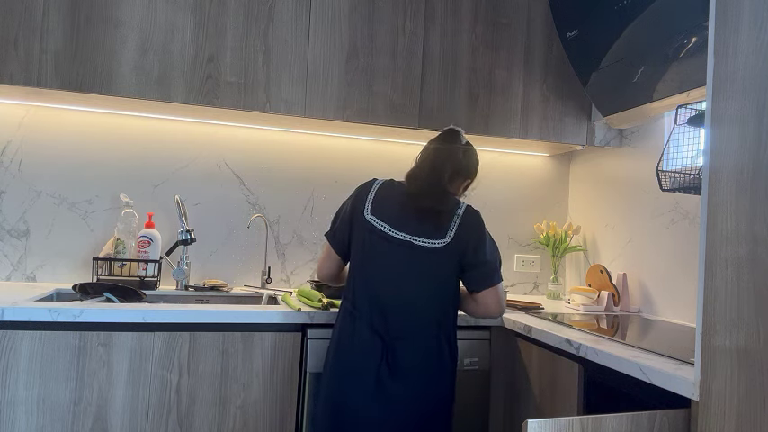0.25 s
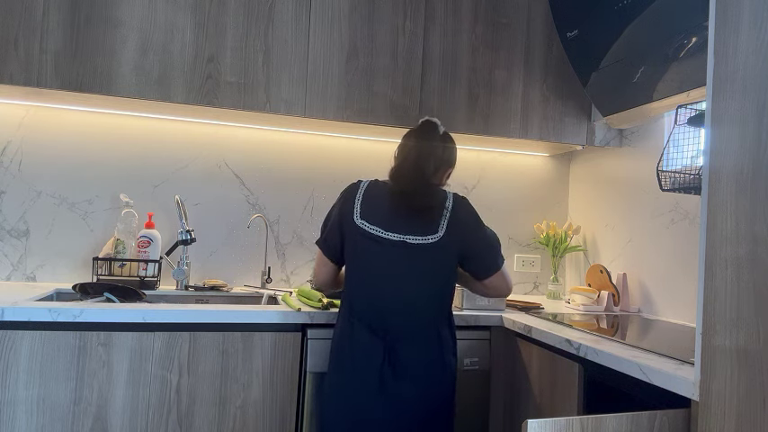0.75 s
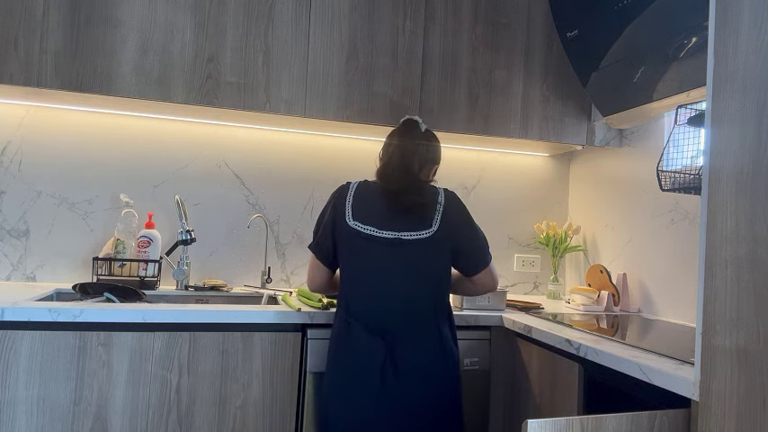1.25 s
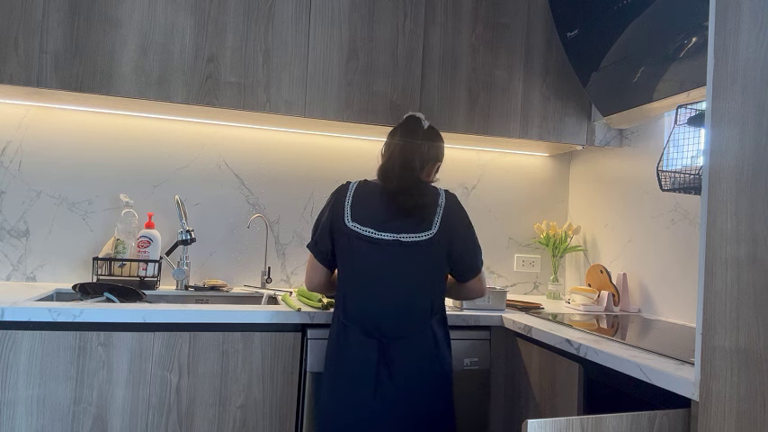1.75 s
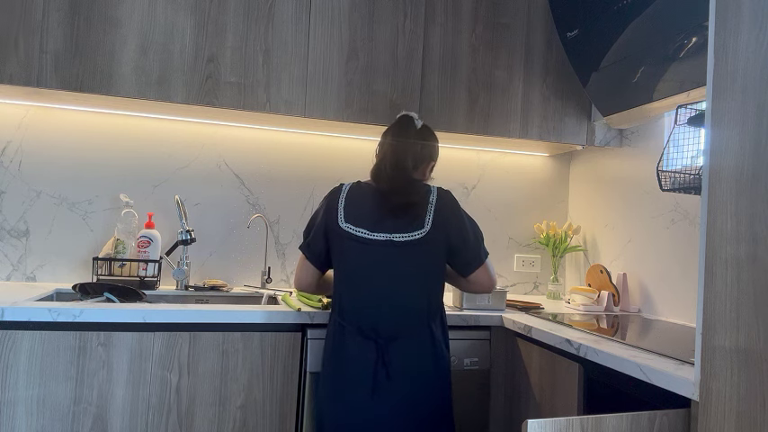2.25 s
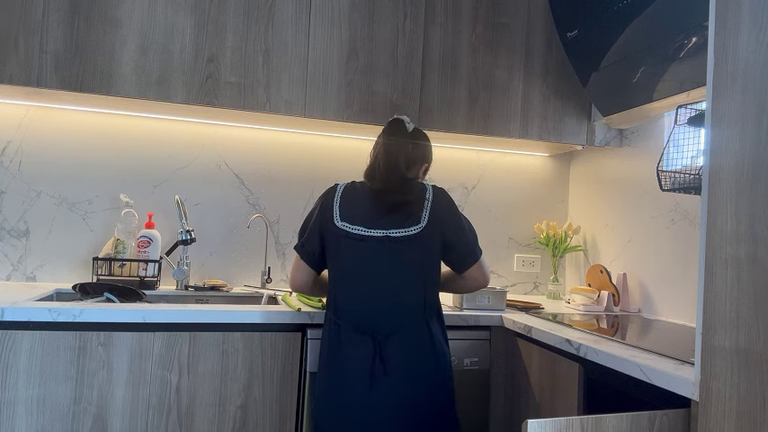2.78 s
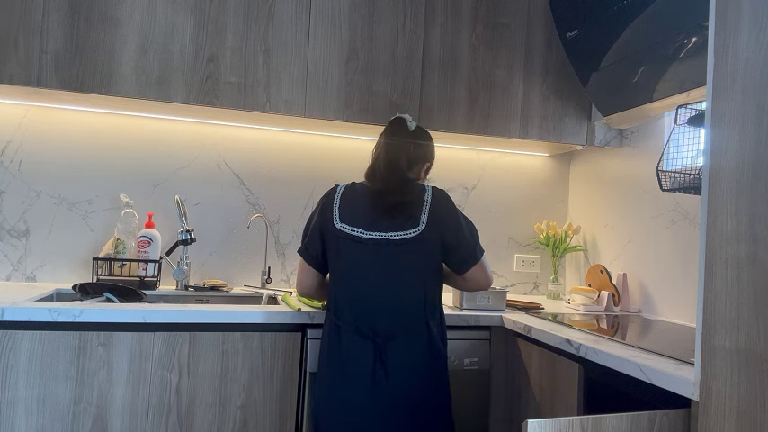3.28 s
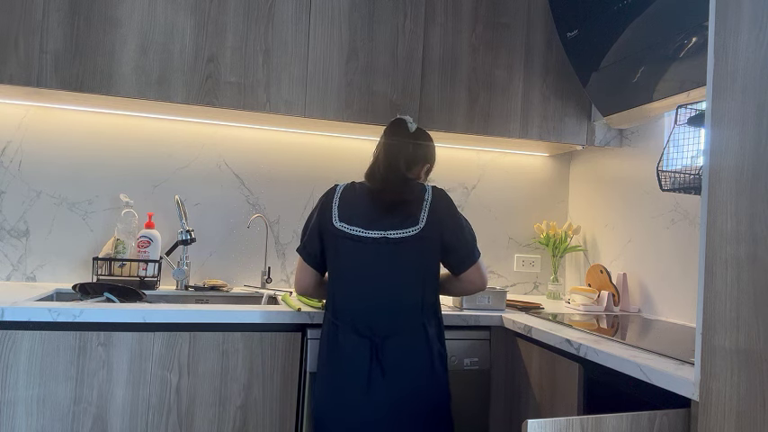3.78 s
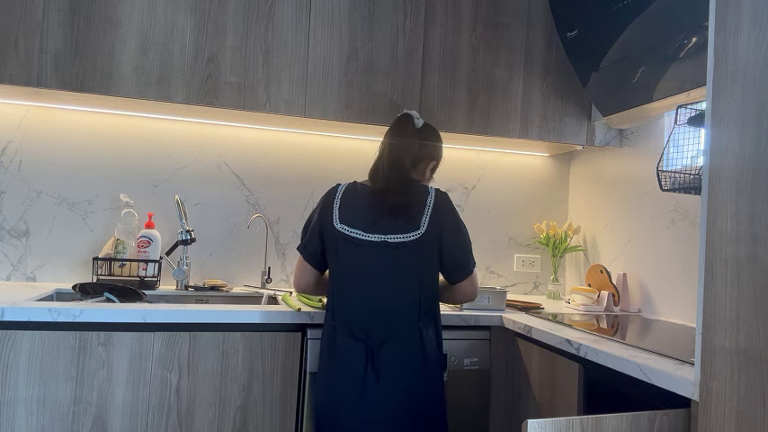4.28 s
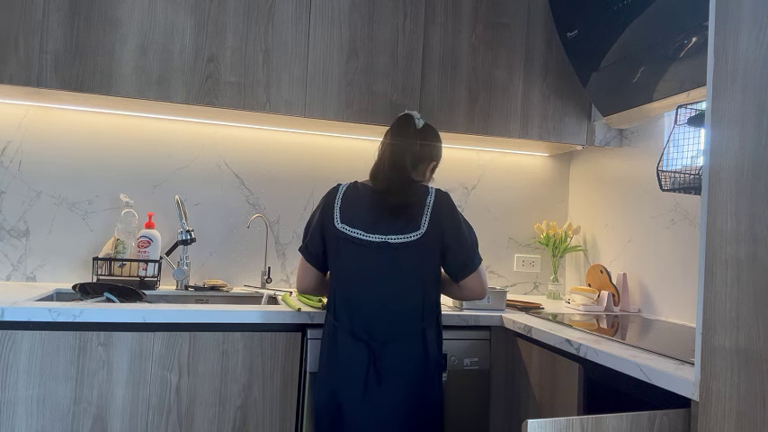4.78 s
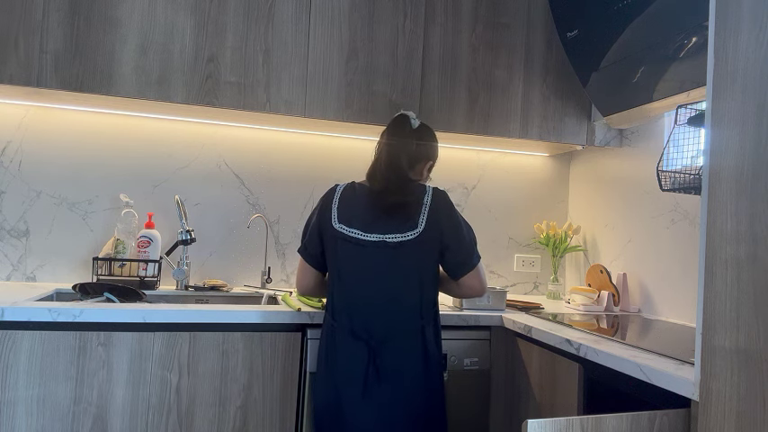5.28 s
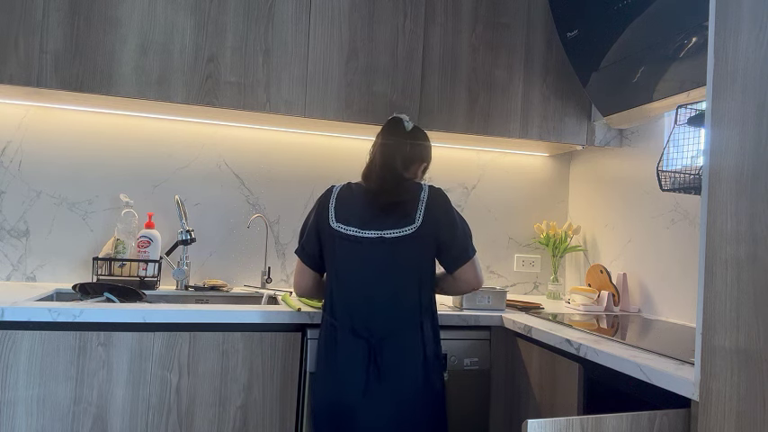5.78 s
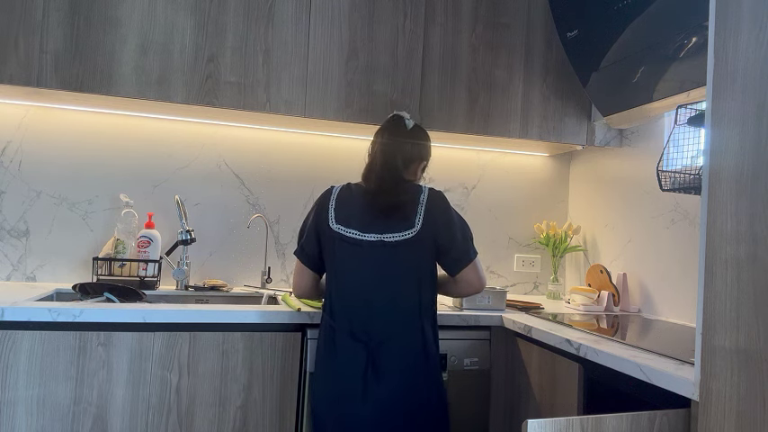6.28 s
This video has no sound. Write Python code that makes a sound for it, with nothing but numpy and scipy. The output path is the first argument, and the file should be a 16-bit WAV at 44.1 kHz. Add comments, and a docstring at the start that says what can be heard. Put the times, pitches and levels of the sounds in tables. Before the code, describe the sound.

A steady low appliance hum with soft blown air, slightly left, runs throughout a hard-walled kitchen, heard from a few metres on a stereo phone. Faint, deep rumbling swells come and go. At about 0.85 s fine fibrous tearing begins, growing into a crisp snap at 1.1 and a more hollow, knocking one at 1.35, followed by a small rip at 1.6. After a pause, tearing from 2.45 builds to a strong, bright crack at 2.7, with a tiny tick at 3.0. Around 3.45 crackling resumes and several quick ticks run into a sharp snap at 3.65. A faint scrape fades at 4.1-4.3, then only hum and air remain. Tearing returns at 5.4 and surges into the loudest, woody snap at 5.6. Every big break rings the board and worktop briefly and leaves a lively room echo of over half a second, dying back into the hum by the end at about 6.5 s.

```python
"""In a hard-walled kitchen, fresh stems are torn and snapped on a board, a few metres from a two-port phone.
Each snap is a burst of fibre cracks, with a push that rings the board and worktop and excites the walls.
Tearing is a patchy stream of tiny cracks; wall echoes carry both on for over half a second.
An appliance on the left hums and blows air (shaped noise), and the lowest room resonance, a wavering
low sine with rumble, swells now and then."""
import sys
import numpy as np
from scipy import signal
from scipy.fft import rfft, irfft
from scipy.io import wavfile
from scipy.ndimage import uniform_filter1d

SR = 44100
rng = np.random.default_rng(int(sys.argv[2]) if len(sys.argv) > 2 else 0)


def transcribe(signal):
    """Save signal, clipped to [-1, 1], as a 16-bit WAV file at the path in sys.argv[1]."""
    frames = np.atleast_2d(signal).T
    limited = np.clip(frames, -1, 1)
    pcm = np.round(limited * 32767).astype(np.int16)
    wavfile.write(sys.argv[1], SR, pcm)


N = 288569
T = np.arange(N) / SR  # time [s]
SIDES = np.array([[1], [-1]])  # sign of a left-right difference at the left and right port


def undb(db):
    """Level to amplitude: 20 dB is a factor of ten."""
    return 10 ** (np.asarray(db) / 20)


def unit(x):
    """Normalization to a root-mean-square of 1."""
    return x / np.sqrt(np.mean(x ** 2))


def band(x, lo_hz, hi_hz):
    """Band-pass filtering with a maximally flat passband."""
    return signal.sosfilt(signal.butter(2, [lo_hz, hi_hz], "bandpass", fs=SR, output="sos"), x)


def on_log(table, hz):
    """Interpolation of (frequency, value) rows along a logarithmic frequency axis."""
    f, v = np.transpose(table)
    return np.interp(np.log(hz + 1e-9), np.log(f), v)


def walk(rate):
    """Slow random modulation: values held for 1 / rate seconds, smoothed twice, standard deviation 1."""
    hold = int(SR / rate)
    steps = np.repeat(rng.standard_normal(N // hold + 1), hold)
    x = uniform_filter1d(uniform_filter1d(steps, hold), hold)[:N]
    return x / x.std()


def decay(t, t60):
    """Exponential decay of amplitude by 60 dB in t60 seconds."""
    return np.exp(-np.log(1000) * t / t60)


def convolve(x, response):
    """Linear system: the output is the input convolved with the impulse response."""
    return signal.fftconvolve(x, response, axes=-1)[..., :N]


def causal(db):
    """Minimum phase: the cepstrum of a gain, folded onto positive times, gives the most compact response."""
    cepstrum = irfft(db * np.log(10) / 20)
    half = len(cepstrum) // 2
    folded = np.concatenate([cepstrum[:1], 2 * cepstrum[1:half], cepstrum[half:half + 1], np.zeros(half - 1)])
    return irfft(np.exp(rfft(folded)))[:half]


def bump(hz, centre_hz, width_hz, db, order=2):
    """Resonance or antiresonance as a peak or dip in dB, at half its dB at the edges of its width."""
    return db / (1 + (2 * (hz - centre_hz) / width_hz) ** order)


def snaps():
    """Brittle fracture: a brief noise swells into each short burst of cracks, then a crackle thins out."""
    # breaks of the stems: (time [s], crack level [dB], knock level [dB], hollowness [dB],
    # hardness [dB per octave], thud [dB], rap [dB], stem ring [Hz], ring level [dB], sizzle level [dB],
    # left minus right [dB]); levels before the common gain
    breaks = [(1.116, -16, -53, -8, 8.5, 0, -5, 4760, 5.5, -3, -3.5),
              (1.3617, -20.5, -26, 9.5, -3.5, 0.5, -3.5, 5040, -1, -1.5, -0.5),
              (2.5465, -38, -52.5, 9, -3.5, 5, -3, 3550, 6, 1, -1.0),
              (2.6961, -11, -25, 4, -1.5, 3.5, -1.5, 3135, 4, 0, -1),
              (2.9894, -41, -57.5, 6, -7, -1, -2, 5350, 4, 11, -0.5),
              (3.4584, -47, -61, 1, -10, 3, 0, 4400, 11, -1, 0.6),
              (3.61, -35, -53, -5.5, 6, 0, -3, 5020, 6, 4, -2),
              (3.6296, -28.5, -46, 3, -1, 6, -5, 3770, 17.5, -3, -0.3),
              (3.6644, -15, -25.5, 1.5, -1.5, 1.5, 0, 3580, 0.5, -1.5, -5.5),
              (5.598, -8, -20, 0, -0.5, 3.5, -2, 4470, -3, 4, -1)]
    gain_db = 32
    burst_peak_ms, rise_ms, rise_db = 0.6, 6.0, -16
    crackle_db, crackle_per_s, crackle_s = -8, 160, 0.061
    ring_width = 0.17  # share of the ring's pitch
    sizzle_hz, sizzle_width_hz = 12930, 3600
    lead = 1024  # samples ahead of the break
    cracks, pushes = np.zeros((2, N)), np.zeros(N)
    hz, t = np.fft.rfftfreq(4096, 1 / SR), T[:8 * lead] - T[lead]
    after = np.clip(t, 0, None) * 1000 / burst_peak_ms
    rising = undb(rise_db) * np.exp(np.clip(t, None, 0) * 1000 / rise_ms)
    shape = np.where(t < 0, rising, after * np.exp(1 - after))
    fading = undb(crackle_db) * (t > 0) * np.exp(-t / crackle_s)
    for s, *colour, ring_hz, ring_db, sizzle_db, pan_db in breaks:
        i = int(s * SR) - lead
        stem = bump(hz, ring_hz, ring_width * ring_hz, ring_db)
        stem = stem + bump(hz, sizzle_hz, sizzle_width_hz, sizzle_db)
        push = causal(blow(hz, *colour) + worktop(hz) + stem)
        burst = shape * rng.standard_normal(len(t)) * undb(2.0 * rng.exponential(size=len(t)))
        parting = rng.random(len(t)) < crackle_per_s / SR
        crackle = fading * rng.standard_normal(len(t)) * parting
        # the burst is scaled to unit energy
        sound = signal.fftconvolve(burst / np.sqrt(np.sum(burst ** 2)) + crackle, push)
        cracks[:, i:i + len(sound)] += sound * undb(pan_db * SIDES / 2)
        pushes[i + lead:i + lead + len(push)] += push
    return undb(gain_db) * cracks, undb(gain_db) * pushes


def blow(hz, crack_db, knock_db, hollow_db, hard_db, thud_db, rap_db):
    """Incoherent sources add in power: bright breaking fibres plus a low knock on the board, in dB."""
    # spectrum of breaking fibres: (frequency [Hz], relative level [dB])
    fibres = [(300, -33), (1120, -40), (2700, -20.5), (4300, -14.5), (7780, -11), (13100, -18.5)]
    knock_low_hz, knock_top_hz = 306, 3570  # the tilt stops below the first, a roll-off begins at the second
    octaves = np.log2(np.clip(hz, knock_low_hz, None) / 1000)
    knock = knock_db + hard_db * octaves
    knock = knock + bump(hz, 613, 264, hollow_db)
    knock = knock + bump(hz, 335, 110, thud_db) + bump(hz, 1510, 270, rap_db)
    knock = knock - 10 * np.log10(1 + (hz / knock_top_hz) ** 4)
    return 10 * np.log10(undb(2 * knock) + undb(2 * (crack_db + on_log(fibres, hz))))


def worktop(hz):
    """Modal response: each contact spot drives the wood's modes differently; the lows roll off, in dB."""
    # resonances of board and worktop: (frequency [Hz], width [Hz], level [dB]), before the spread by spot
    modes = [(340, 175, 6), (613, 176, 9), (1070, 306, 10.5), (1650, 190, 4.5), (2640, 510, 2)]
    spot_db, spot_shift = 1.5, .04  # spread in level and as a share of pitch
    spot = rng.standard_normal((len(modes), 2))
    rings = sum(bump(hz, f * (1 + spot_shift * a), width, db + spot_db * b)
                for (f, width, db), (a, b) in zip(modes, spot))
    return rings - 10 * np.log10(1 + (200.0 / (hz + 1)) ** 6)


def board():
    """Modal ringing: damped sines answer each push, the low ones building up later."""
    # short rings of the board: (frequency [Hz], level [dB], 60 dB decay time [s])
    board_modes = [(350.4, -45.5, .15), (650.5, -43.5, 0.13), (1034, -48, .09), (1140, -36, 0.085),
                   (1620, -56, .08), (2580, -45, .1)]
    fill_cycles, left_late_ms = 3.7, 0.23
    t = np.clip(T[:SR // 4] - left_late_ms / 1000 * np.array([[1], [0]]), 0, None)
    out = 0
    for hz, db, t60 in board_modes:
        fill = 1 - np.exp(-(t * hz / fill_cycles) ** 2)
        out = out + undb(db) * fill * np.sin(2 * np.pi * hz * t) * decay(t, t60)
    return out


def tearing():
    """Crackling noise: dense tiny cracks of uneven size; each pull sets in, grows or slackens, and lets go."""
    # pulls: (start [s], length [s], first level [dB], last level [dB],
    # duller scrape re hiss [dB], brighter hiss re hiss [dB]), before the patchiness
    pulls = [(0.852, 0.15, -73.5, -72.5, -1, -3), (0.989, 0.24, -74.5, -59, 3, -5),
             (1.596, 0.12, -73, -70.5, -1, -4), (2.436, 0.12, -81, -67, -1, -3.5),
             (2.555, 0.13, -64, -60, 1.5, -2.5), (2.985, 0.05, -72, -78, -3, 1),
             (3.448, 0.15, -72.5, -84, 1, 0), (3.583, 0.074, -65, -58, 3.5, 2),
             (4.06, 0.27, -77.5, -87, 0, -4), (5.407, 0.07, -79, -83, 1, 0),
             (5.465, 0.123, -66, -64, -12, -2), (5.565, 0.031, -60, -43, -0.5, -7)]
    attack_s, release_s = 0.017, 0.029
    patchy_db, patches_per_s = 4, 40.
    scrape_low_db = -4.5  # lower edge of the scrape
    grit = rng.standard_normal(N) * undb(3.15 * rng.exponential(size=N))
    bands_hz = [(5170, 9700), (2620, 4680), (10500, 13200), (1130, 3000)]  # hiss, dull, bright, low
    layers = np.array([unit(band(grit, lo, hi)) for lo, hi in bands_hz])
    out = np.zeros(N)
    for s, length, first_db, last_db, dull_db, bright_db in pulls:
        span = slice(int(s * SR), int((s + length + release_s) * SR))
        t, (hiss, dull, bright, low) = T[span], layers[:, span]
        attack = np.clip((t - s) / attack_s, 0, 1)
        release = np.clip(1 - (t - s - length) / release_s, 0, 1) ** 2
        pull = attack * release * undb(np.interp(t, [s, s + length], [first_db, last_db]))
        scrape = undb(dull_db) * (dull + undb(scrape_low_db) * low)
        out[span] += pull * (hiss + scrape + undb(bright_db) * bright)
    return undb(patchy_db * walk(patches_per_s)) * out


def paths():
    """Image sources: the straight path and nearest reflections are delayed copies, offset between ports."""
    # first arrivals from the hands: (delay midway between the ports [ms], level [dB], left port late by [ms])
    arrivals = [(0.2, -1, 0.17), (3.93, 2, 0.23), (7.5, -1, -0.12), (13.36, -7.5, 0.11),
                (21.86, -15.5, -0.11), (31.5, -26, 0.26)]
    hz = np.fft.rfftfreq(4096, 1 / SR)
    spectrum = 0
    for ms, db, late in arrivals:
        delay_s = (ms + late * SIDES / 2) / 1000
        spectrum = spectrum + undb(db) * np.exp(-2j * np.pi * hz * delay_s)
    return irfft(spectrum)


def walls():
    """Reverberation: a diffuse field decaying at its own rate in each band, plus distinct low room modes."""
    # diffuse echoes by octave band: (centre [Hz], 60 dB decay time [s], level [dB])
    octave_bands = [(186, 1, 3), (408, 0.75, -2.5), (803, 0.72, 2), (1696, 0.68, 5.5), (2910, 0.77, 3.5),
                    (6100, 0.67, 3), (14600, 0.49, 2)]
    # share of the echoes that both ports hear alike: (frequency [Hz], share [0-1])
    echo_alike = [(100, 0.8), (250, 0.46), (500, 0), (2000, 0), (8000, 0.27), (14000, 0)]
    # clear low room modes: (frequency [Hz], level re modes_db [dB], 60 dB decay time [s])
    room_modes = [(223, -21, 1), (260.2, -8.5, 0.88), (291, -2.5, 0.58), (333, 1, 0.43), (351, 4.5, 0.28),
                  (383, -35, 0.4), (496, -8, 0.54), (527, -2.5, 0.7), (544, -4.5, 0.7), (574, -4.5, 0.46),
                  (591, -7, 0.5), (613, -10, 0.42), (642.6, 0.5, 0.34), (662, 0.5, 0.32), (727, -7, 0.27),
                  (805, -6, 0.74), (825, -1, 0.7), (866, -5, 0.3), (990, -17, 0.7), (1050, -21.5, 0.43),
                  (1057, -21, 0.5), (1110, -6, 0.21)]
    modes_db = -49
    fill_s, fill_cycles = 0.0011, 1.5  # low echoes build up more slowly
    lumps_db, lumps_per_s, lumps_s = 2, 253, 0.108  # early echoes come in clumps that smooth out
    lumps_hz = 3000.  # below this, echoes are less clumped
    t = T[:SR]
    out = 0

    def fill(hz):
        """Gradual build-up of echo density."""
        return 1 - np.exp(-(t / (fill_s + fill_cycles / hz)) ** 2)

    for hz, t60, db in octave_bands:
        alike = np.clip(on_log(echo_alike, hz), 0, 1)
        top_hz = min(hz * np.sqrt(2), .45 * SR)
        mid, side = band(rng.standard_normal((2, SR)), hz / np.sqrt(2), top_hz)
        ports = np.sqrt(1 + alike) * mid + np.sqrt(1 - alike) * side * SIDES
        clumping_db = lumps_db * min(hz / lumps_hz, 1) * walk(lumps_per_s)[:SR] * np.exp(-t / lumps_s)
        energy = t60 * SR / np.log(1e6)  # summed square of the decay
        out = out + undb(db + clumping_db) * fill(hz) * ports * decay(t, t60) / np.sqrt(energy)
    phases = rng.standard_normal((len(room_modes), 2))
    for (hz, db, t60), (start, apart) in zip(room_modes, phases):
        # the shorter the wave, the more the two ports differ in phase
        phase = .5 * start + apart * hz / 1140.0 * SIDES
        flutter_db = 1.3 * walk(29.5)[:SR]  # beating with weaker neighbours
        tone = np.sin(2 * np.pi * hz * t + phase)
        out = out + undb(modes_db + db + flutter_db) * fill(hz) * tone * decay(t, t60)
    return out


def appliance(lag_s=0.00039):
    """Interaural coherence: blown air partly alike (late at the right), partly diffuse; narrow-band hum."""
    # spectrum of blown air before the boost of its straight part and scaling: (frequency [Hz], level [dB])
    air_spectrum = [(15, -76), (25, -31), (70, -10), (107, -10.5), (144, -11), (184, -5.5), (250, -5.5),
                    (308, -5.5), (392, -6.5), (791, -5), (1500, -9.5), (2400, -12), (4000, -23.5),
                    (5500, -27.5), (7800, -31), (9600, -37.5), (11300, -39), (14000, -35.5), (15800, -51)]
    # share of the air that comes straight: (frequency [Hz], share [0-1])
    straight_share = [(40, 0.92), (130, 0.8), (290, 0.58), (640, 0.31), (3000, 0.02), (14000, 0.5)]
    # balance of the air: (frequency [Hz], left minus right [dB])
    balance = [(60, -4.5), (150, 3), (400, 0), (1000, 2.5), (4000, 0.8), (9000, -0.5)]
    # hum, each band from 7 Hz below to 9 Hz above: (frequency [Hz], level [dB]), before the sway
    hum_bands = [(118.4, -59.5), (160, -53), (199.2, -56.5), (240, -56), (317.6, -57.5), (371.4, -58),
                 (473.7, -56.5), (629.8, -62), (795, -62)]
    air_db, air_sway_db, air_sways_per_s = -42, .5, 1.79
    hum_sway_db, hum_sways_per_s = 1.5, 3.514
    hz = np.fft.rfftfreq(N, 1 / SR)
    alike = np.clip(on_log(straight_share, hz), 0, .99)
    straight, left, right = rfft(rng.standard_normal((3, N)))
    late = np.exp(-2j * np.pi * hz * lag_s)
    ports = np.sqrt(alike) * straight * np.array([late ** 0, late])
    ports = ports + np.sqrt(1 - alike) * np.array([left, right])
    gain = undb(on_log(air_spectrum, hz) + on_log(balance, hz) * SIDES / 2)
    gain = gain / np.sqrt(1.02 - alike)  # stronger where more comes straight
    air = unit(irfft(ports * gain, N)) * undb(air_db + air_sway_db * walk(air_sways_per_s))
    hum = 0
    for f, db in hum_bands:
        level = undb(db + hum_sway_db * walk(hum_sways_per_s))
        hum = hum + level * unit(band(rng.standard_normal(N), f - 7.0, f + 9.0))
    return air + hum * undb(.6 * SIDES)


def boom(hz=54.3):
    """Lowest room mode: a sine of wavering pitch with looser rumble, swaying faintly and swelling at times."""
    # swells: (peak time [s], level of the sine [dB], length between 1/e points [s])
    swells = [(.19, -47, 0.24), (0.698, -55, .16), (1.04, -58, 0.077), (1.232, -40.5, 0.15),
              (1.448, -38, 0.12), (1.914, -57, 0.063), (2.373, -51, 0.187), (2.67, -43, 0.15),
              (2.8, -44.5, 0.124), (3.09, -56, 0.09), (3.25, -52.5, 0.13), (3.72, -48, 0.15),
              (4.15, -57, 0.073), (4.32, -62, 0.071), (4.87, -55, 0.087), (5.47, -54, .07),
              (5.67, -48.5, 0.21), (5.83, -62, 0.056)]
    rest_db, sway_db, sways_per_s = -64.5, 1.5, 11  # between swells
    level = undb(rest_db + sway_db * walk(sways_per_s))
    level = level + sum(undb(db) * np.exp(-(2 * (T - s) / length) ** 2) for s, db, length in swells)
    rumble = undb(-9.5) * unit(band(band(rng.standard_normal(N), 43, 104.0), 43, 104.0))
    tone = np.sin(2 * np.pi * np.cumsum(hz + 2.49 * walk(2.9)) / SR)
    return level * np.sqrt(2) * (tone + rumble)


def scene():
    """Superposition: direct cracks, board rings, tearing and wall echoes over the appliance and room mode."""
    direct_db, tear_echo_db = -7, 13
    cracks, pushes = snaps()
    tear = tearing()
    echo = convolve((pushes + undb(tear_echo_db) * tear)[None], walls())
    # the low thud builds up in worktop and walls; the direct path carries the crack
    direct = undb(direct_db) * convolve(band(cracks, 860.0, 15000.0), paths())
    return direct + convolve(pushes[None], board()) + tear + echo + appliance() + boom()


def record(dry):
    """Saturation rounds the peaks; the spectrum has narrow dips near 10 and 15.6 kHz and a steep low-pass."""
    # dips in the spectrum: (centre [Hz], width [Hz], level [dB])
    dips = [(10350., 900., -22.0), (15600., 1500., -14.0)]
    top_hz = 15800
    hz = np.fft.rfftfreq(512, 1 / SR)
    dipped = causal(sum(bump(hz, *dip, order=4) for dip in dips))
    rounded = np.tanh(.45 * dry) / .45
    low_pass = signal.ellip(12, .2, 80, top_hz, fs=SR, output="sos")
    return signal.sosfilt(low_pass, convolve(rounded, dipped[None]))


dry = scene()
out = record(dry)
transcribe(out)
```